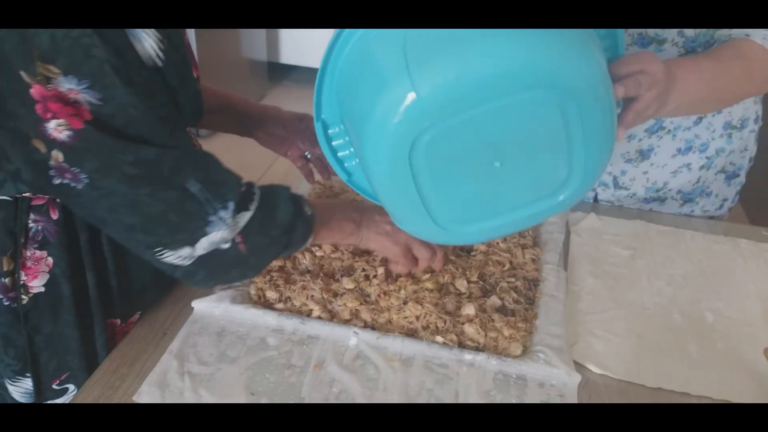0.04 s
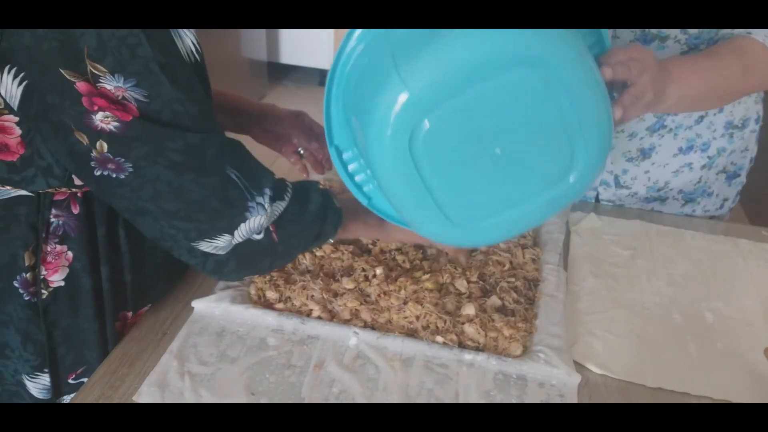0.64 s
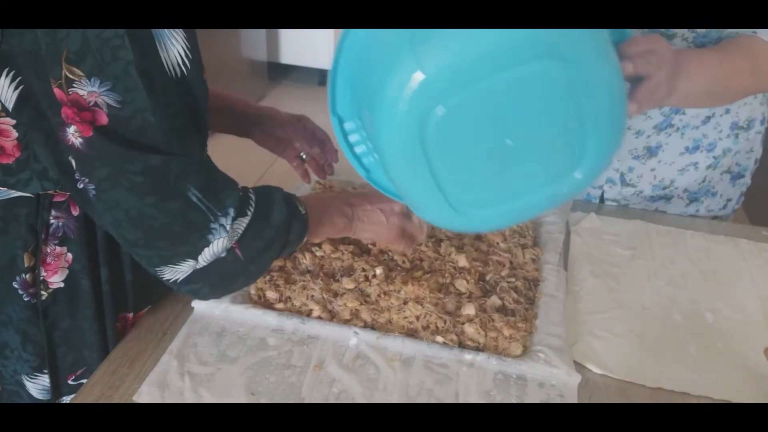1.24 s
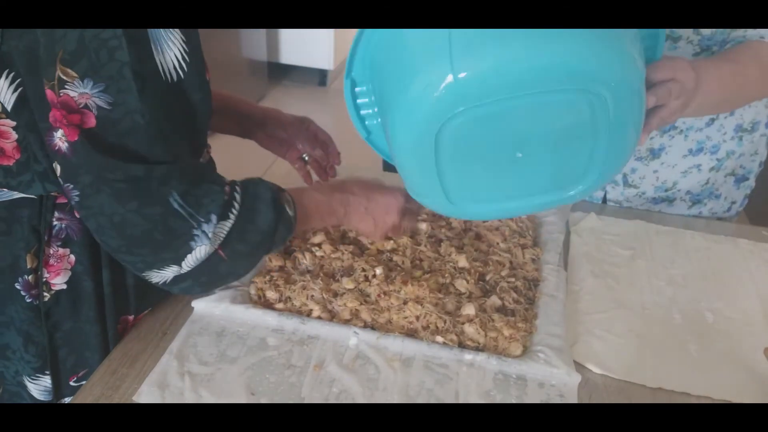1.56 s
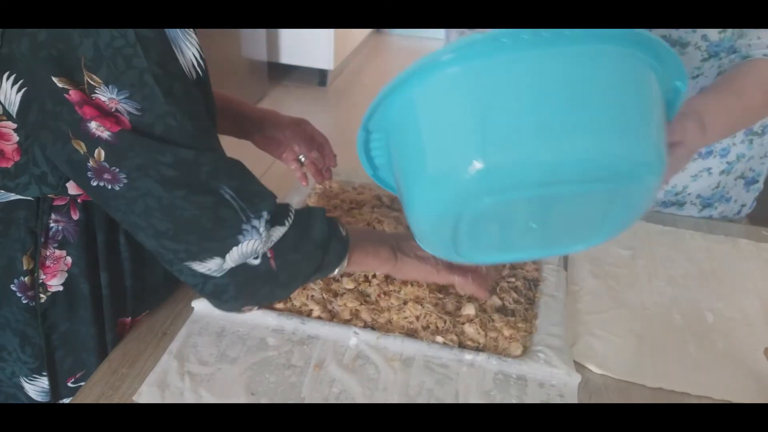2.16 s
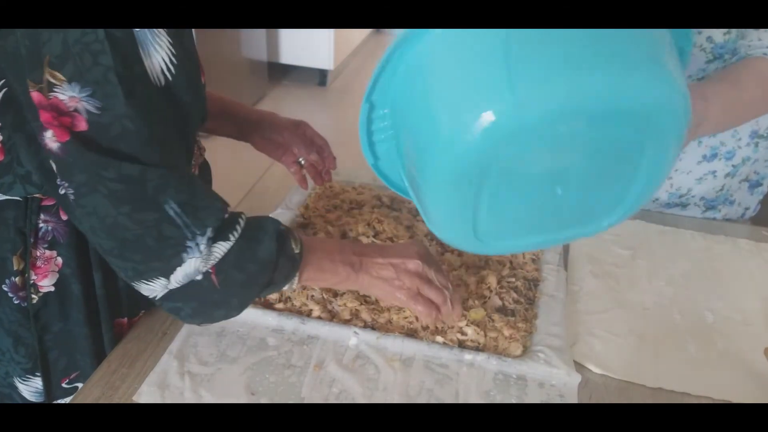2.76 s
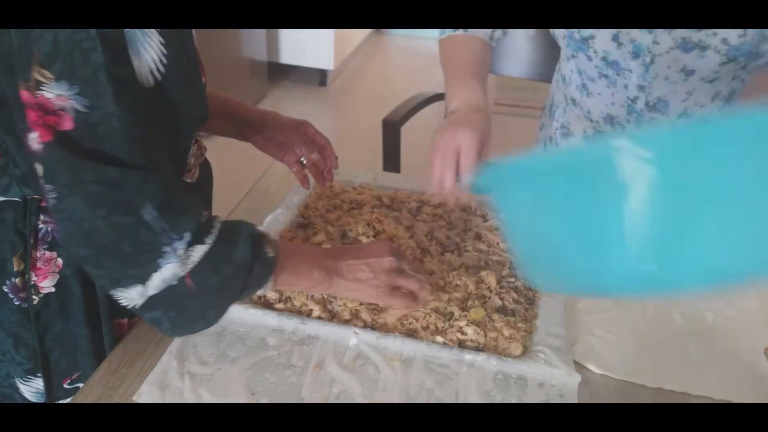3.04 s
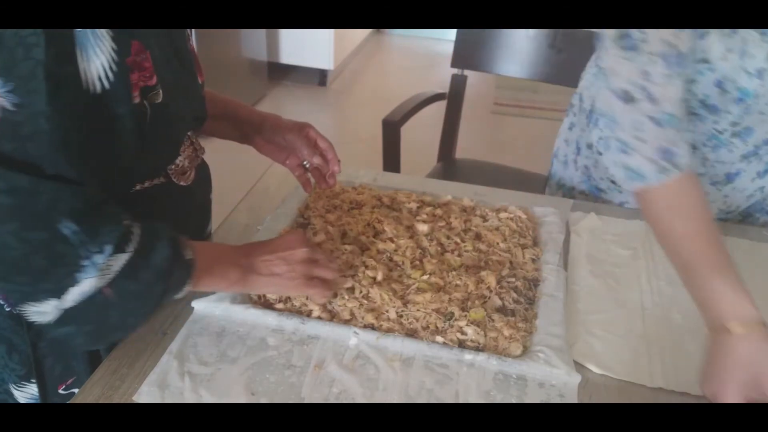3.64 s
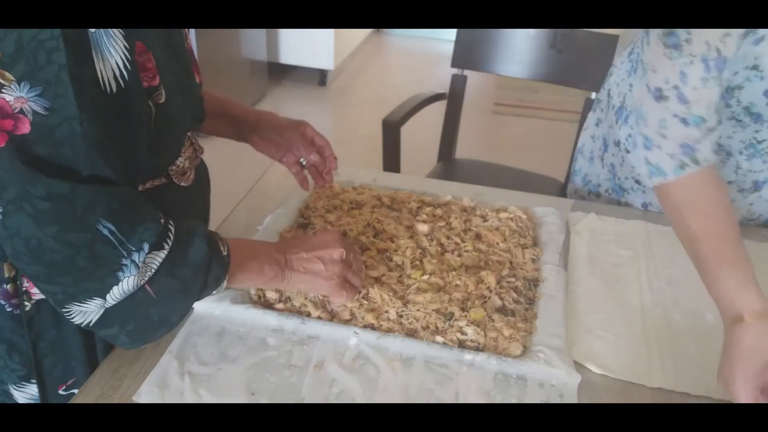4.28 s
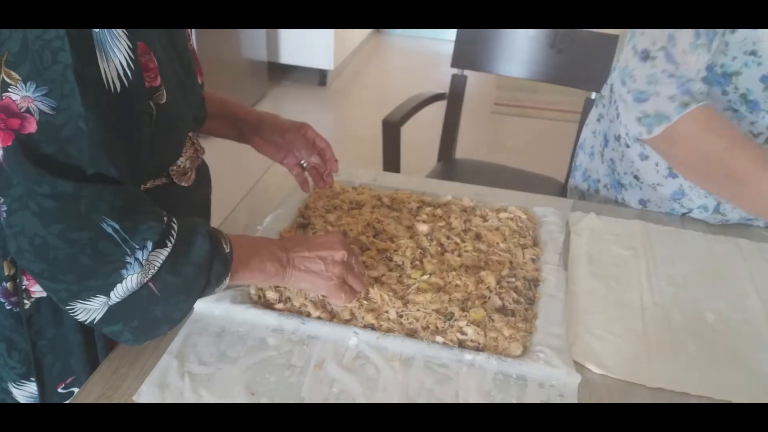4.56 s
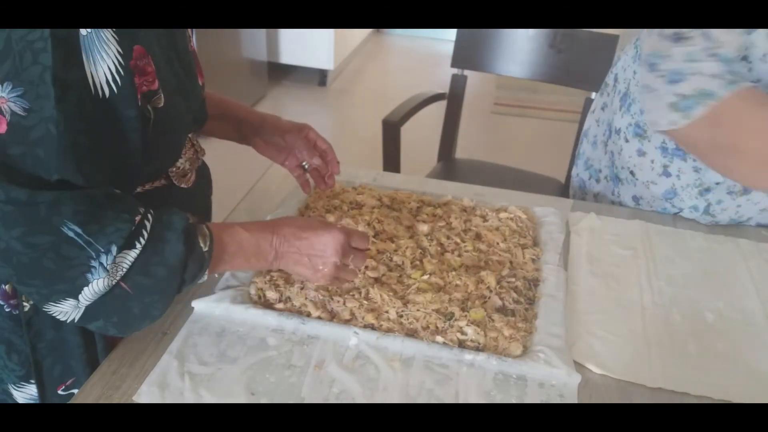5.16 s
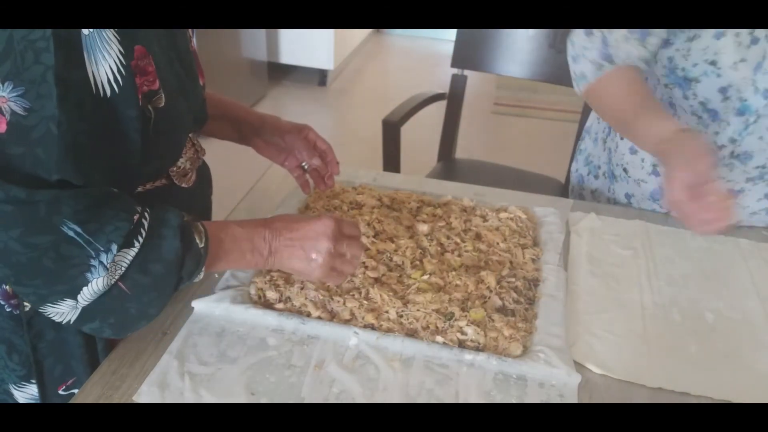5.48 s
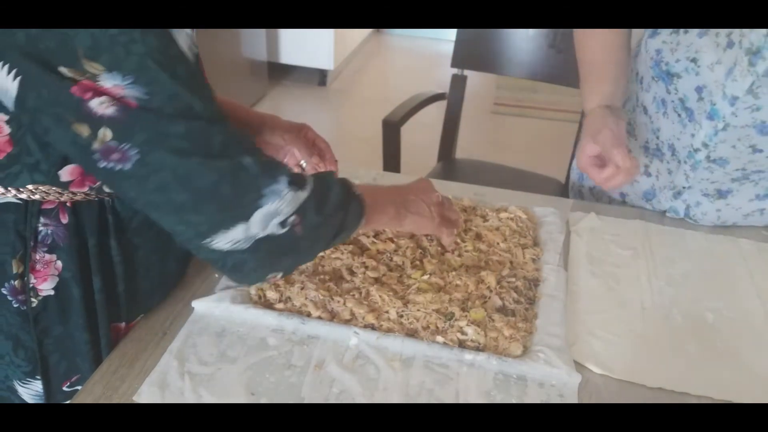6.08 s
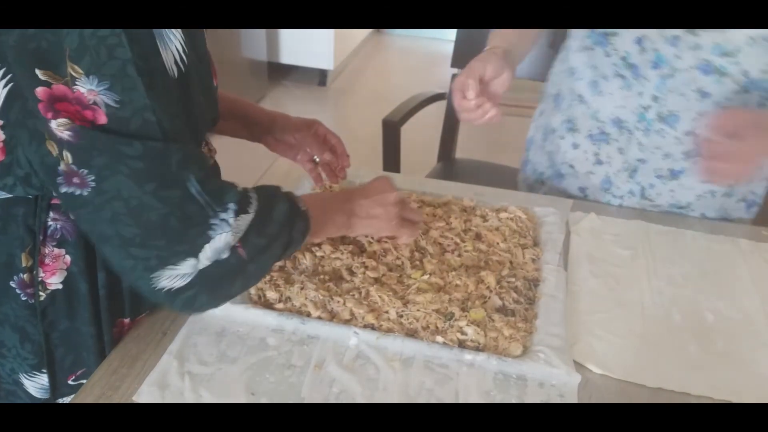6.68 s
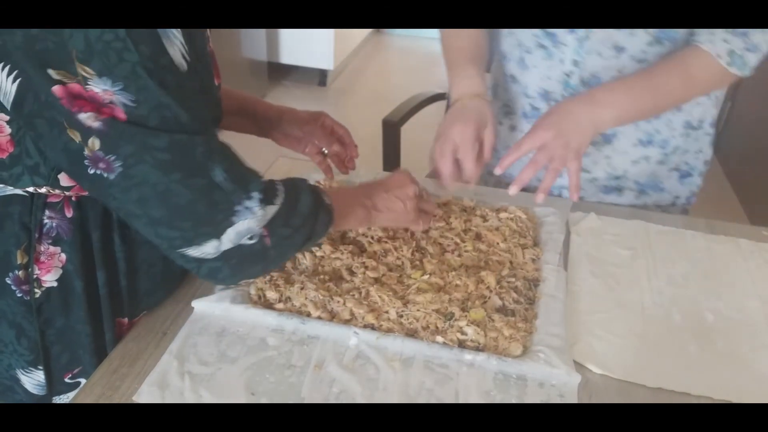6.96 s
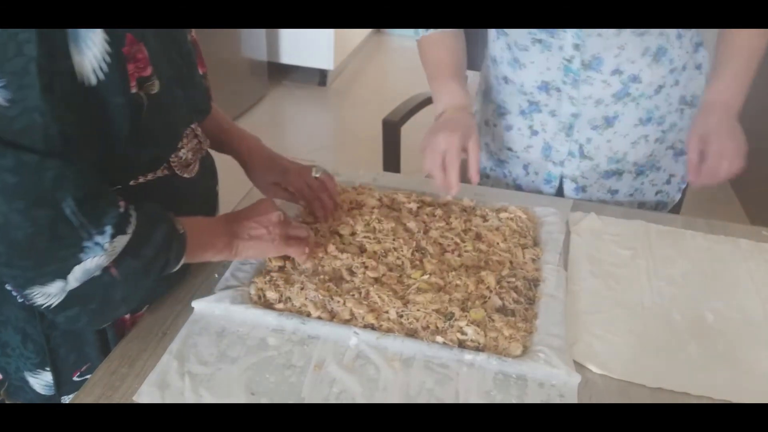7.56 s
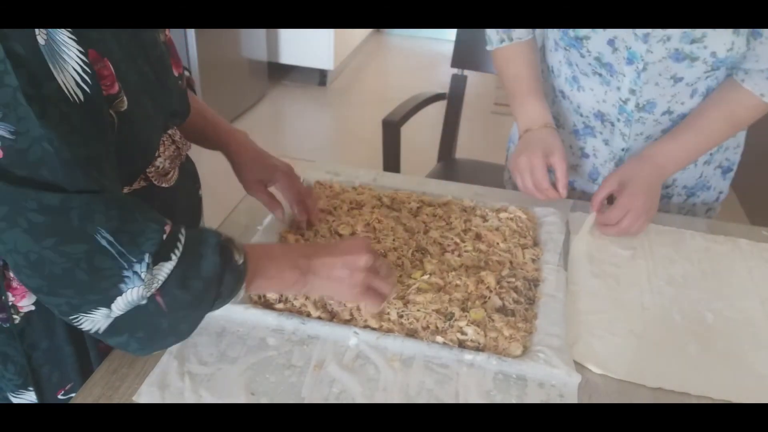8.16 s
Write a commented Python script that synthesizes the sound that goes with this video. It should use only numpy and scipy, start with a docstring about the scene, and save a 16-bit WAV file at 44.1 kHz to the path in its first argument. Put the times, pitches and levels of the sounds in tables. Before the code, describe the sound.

For the first three seconds, hands softly and irregularly pat moist filling close to the microphone, with light rubs and a faint crinkle of pastry at the start. Near 3.8 seconds a rub and another crinkle lead into a nudged dish, which clinks clearly at 4 seconds. At about 4.5 seconds an empty plastic basin lands a little further off with a loud hollow boom, then rocks and clatters until roughly 5.2 seconds. Two more sharp plastic knocks follow near 5.7 and 5.9 seconds. A slipper scuffs faintly at 6.3 seconds and a soft footstep thumps at 6.6. Quiet rubbing and a small crinkle return around 7 seconds, then a very faint, brief whine and a last pat near 7.6 seconds. The kitchen adds a short, hard-walled echo, and a low room murmur with faint hiss continues to the end, just past 8 seconds.

```python
"""Filling pastry, basin set aside

Hands pat and spread moist filling over crinkling pastry in a hard-walled kitchen; a nudged dish clinks.
An emptied plastic basin lands with a hollow boom, rocks, clatters and takes two last sharp knocks,
each blow ringing its bottom, walls and rim. A slipper scuffs, a footstep thumps softly,
and the hands go on quietly over room murmur and a brief whine."""
import sys
import numpy as np
from scipy import signal
from scipy.fft import rfft, irfft, next_fast_len
from scipy.io import wavfile
from scipy.ndimage import uniform_filter1d

SR = 44100
rng = np.random.default_rng(int(sys.argv[2]) if len(sys.argv) > 2 else 0)


def pcm_store(signal):
    """Save signal as 16-bit PCM."""
    levels = np.round(np.clip(np.atleast_2d(signal), -1, 1) * 32767)
    wavfile.write(sys.argv[1], SR, levels.astype(np.int16).T)


N = 371322
EVENT_S = np.arange(SR // 4) / SR


def amp(db):
    """Decibels to gain."""
    return 10 ** (np.asarray(db) / 20)


def curve(points, hz):
    """Interpolates on a log-frequency axis."""
    f, value = np.transpose(points)
    return np.interp(np.log(hz + 1), np.log(f), value)


def bell(hz, centre_hz, width_oct):
    """Bell of height 1 on a log-frequency axis."""
    return np.exp(-(np.log2((hz + 1) / centre_hz) / width_oct) ** 2)


def rolloff_db(ratio, order):
    """Butterworth slope, -3 dB at ratio 1."""
    return -10 * np.log10(1 + ratio ** (2 * order))


def decay(t60_s, t=EVENT_S):
    """Envelope falling 60 dB in t60_s."""
    return np.exp(-np.log(1000) * t / t60_s)


def unit_rms(x):
    """Scales to rms 1."""
    return x / np.sqrt(np.mean(x ** 2) + 1e-20)


def unit_attack(x):
    """Scales the first 10 ms to rms 1."""
    return x / np.sqrt(np.mean(x[:SR // 100] ** 2) + 1e-20)


def add(mix, start_s, sound):
    """Mixes a sound in at start_s."""
    part = mix[max(round(start_s * SR), 0):][:len(sound)]
    part += sound[:len(part)]


def colour(x, db_at):
    """Minimum-phase filter with gain db_at(hz)."""
    size = 2 * next_fast_len(len(x))
    hz = abs(np.fft.fftfreq(size, 1 / SR))
    log_gain = np.log(amp(np.maximum(db_at(hz), -100)))
    response = np.exp(np.conj(signal.hilbert(log_gain)))[:size // 2 + 1]
    return irfft(rfft(x, size) * response)[:len(x)]


def whiten(x, bins):
    """Flattens a burst's spectrum and fades its end."""
    spectrum = rfft(x)
    local_rms = np.sqrt(uniform_filter1d(abs(spectrum) ** 2, size=bins))
    return irfft(spectrum / local_rms, len(x)) * np.linspace(1, 0, len(x)) ** 2


def ring(modes, spread_db, low_hz=1, t60_scale=1):
    """Decaying sines; each blow lands elsewhere and shares its energy differently."""
    hz, db, t60_s = np.transpose(modes)[:, :, None]
    share = amp(db + spread_db * rng.standard_normal(hz.shape)) * rng.choice([-1, 1], hz.shape)
    share /= np.sqrt(1 + (low_hz / hz) ** 6)
    partials = share * decay(t60_s * t60_scale) * np.cos(2 * np.pi * hz * EVENT_S)
    attack = 1 - np.exp(-EVENT_S / 0.0006)
    return unit_attack(attack * partials.sum(0))


def dense_modes(db_at, t60_s, crack=0):
    """Unresolved modes as decaying noise, with an optional crack at contact."""
    envelope = decay(t60_s) + crack * np.exp(-EVENT_S / 0.0015)
    burst = rng.standard_normal(len(EVENT_S)) * envelope
    return unit_attack(colour(whiten(burst, bins=35), db_at))


def slips(per_s):
    """Tiny random clicks, a few much larger than the rest."""
    n = len(EVENT_S)
    sizes = rng.standard_normal(n) * amp(2.4 * np.minimum(rng.exponential(1, n), 4))
    return sizes * (rng.random(n) < per_s / SR)


# room noise spectrum (frequency [Hz], level [dB])
ROOM_TONE = [(15, -43), (25, -16), (59, 1), (126, 0.5), (246, -8), (509, -8.5), (1000, -13), (2420, -18.5),
             (3170, -16.5), (4750, -20.5), (6100, -14.5), (7500, -24), (15500, -27)]
def room_tone():
    """Steady low murmur and faint hiss, nearly alike on both sides."""
    hz = np.fft.rfftfreq(N, 1 / SR)
    mid, side = irfft(rfft(rng.standard_normal((2, N))) * amp(curve(ROOM_TONE, hz)), N)
    return amp(-60) * (unit_rms(mid) + amp(-14) * unit_rms(side) * np.array([[1], [-1]]))


def whine(start_s=7.32, end_s=7.62, pitch_hz=498):
    """A faint, fuzzy tone swells briefly: harmonics 2-4, no fundamental."""
    out = np.zeros(N)
    t = np.arange(start_s, end_s, 1 / SR)
    waver = unit_rms(uniform_filter1d(rng.standard_normal(len(t)), size=200))
    cycles = np.cumsum(pitch_hz * (1 + 0.017 * waver)) / SR
    tone = sum(np.sin(2 * np.pi * k * cycles) for k in (2, 3, 4))
    swell = np.sin(np.pi * np.linspace(0, 1, len(t)))
    add(out, start_s, amp(-63) * unit_rms(tone) * swell)
    return out


# reverberation (frequency [Hz], t60 [s])
ROOM_DECAY = [(100, 0.21), (300, 0.47), (700, 0.53), (1800, 0.47), (4500, 0.51), (9000, 0.39),
              (15000, 0.13)]
# counter and cupboard reflections (delay [s], relative gain [ratio])
REFLECTIONS = [(.0075, 0.4), (0.01, 0.5)]
def room_response(echo_db, tail_db):
    """Direct sound, single echoes, then a diffuse tail dying band by band."""
    taps = rng.choice([-1., 1.], SR) * (rng.random(SR) < 5000 / SR)
    hz, t, bands = signal.stft(taps, SR, nperseg=256)
    bands *= decay(curve(ROOM_DECAY, hz)[:, None], t)
    tail = signal.istft(bands, SR, nperseg=256)[1][:SR]
    build_up = 1 - np.exp(-(np.arange(SR) / SR / 0.0083) ** 2)
    out = amp(tail_db) * build_up * whiten(tail * build_up, bins=30)
    out[0] += 1
    for delay_s, gain in REFLECTIONS:
        add(out, delay_s, amp(echo_db) * gain * np.array([1, 2, 1]) / 4)
    return out


def kitchen(x, echo_db, tail_db, drift_hz=5.5):
    """Moving sources drift through three paths into the room."""
    cycles = np.arange(N) / SR * drift_hz
    shares = [2 / 3 * np.sin(np.pi * (cycles + k / 3)) ** 2 for k in range(3)]
    return sum(signal.oaconvolve(x * share, room_response(echo_db, tail_db))[:N] for share in shares)


# fine crackle (frequency [Hz], level [dB])
CRACKLE_SPECTRUM = [(1000, 6), (3000, 4), (6000, 14), (9000, 3.5), (16000, -28)]
def crackle(t60_s):
    """One small snap, then a dying scatter of others."""
    snaps = 0.75 * slips(per_s=600) * decay(t60_s)
    snaps[0] = 1
    return unit_attack(colour(snaps, lambda f: curve(CRACKLE_SPECTRUM, f)))


# sheets snapping (time [s], level [dB])
PASTRY_SNAPS = [(.188, -52), (3.844, -54.5), (6.921, -58.5)]
def pastry():
    """A sheet gives way: crisp snaps over a duller flap."""
    out = np.zeros(N)
    for start_s, db in PASTRY_SNAPS:
        flap = dense_modes(lambda f: -9 * abs(np.log2((f + 1) / 1700)), t60_s=0.11)
        add(out, start_s, amp(db) * (crackle(t60_s=0.41) + amp(-1.5) * flap))
    return out


# hand strokes and, at 6.294 s, one slipper scuff
# (time [s], length [s], level [dB], resonance [Hz], width [oct], scrape [Hz], scrape [dB])
RUB_EVENTS = [(0.183, 0.14, -57.5, 5830, 0.22, 2070, -12), (2.629, 0.097, -51.5, 1520, 0.61, 5800, -12),
              (2.793, 0.21, -63, 1030, .15, 1860, -26), (3.685, 0.34, -56.5, 1660, 0.27, 790, -6),
              (3.831, 0.07, -39.5, 1377, 0.36, 3640, -12), (6.294, 0.2, -55.5, 1694, 0.36, 3380, -7),
              (6.908, 0.07, -45.5, 1020, 0.45, 2440, -5.5), (7.157, 0.093, -57.5, 1770, 0.3, 8200, -5.5),
              (7.589, 0.086, -42, 723, 0.55, 2990, -10)]
def rubs():
    """Tiny slips swell and fade in each rub, heard as two resonances and fine crackle."""
    def resonance(x, centre_hz, width_oct):
        return unit_rms(colour(x, lambda f: rolloff_db(np.log2((f + 1) / centre_hz) / width_oct, 2)))

    out = np.zeros(N)
    for start_s, length_s, db, body_hz, width_oct, scrape_hz, scrape_db in RUB_EVENTS:
        swell = np.sin(np.pi * np.minimum(EVENT_S / length_s, 1))
        friction = slips(per_s=3000)
        body = resonance(friction, body_hz, width_oct)
        scrape = resonance(friction, scrape_hz, width_oct=0.17)
        fizz = unit_rms(colour(friction, lambda f: curve(CRACKLE_SPECTRUM, f)))
        add(out, start_s, amp(db) * swell * (body + amp(scrape_db) * scrape + amp(-33.5) * fizz))
    return out


# soft slap (frequency [Hz], level [dB])
SLAP_SPECTRUM = [(80, 0), (190, 5.5), (400, 0.5), (580, 4.5), (800, -7), (1000, 1), (1200, -6.5),
                 (1600, -1.5), (3000, -1.5), (9000, 7)]
def touch(thud_hz, hollow_hz, cutoff_hz, firmness):
    """Damped thud, slap with cupped-air resonance, crackle; firmness lifts thud and crackle."""
    def slap_db(f):
        hollow_db = 9.5 * bell(f, hollow_hz, width_oct=0.31)
        return curve(SLAP_SPECTRUM, f) + hollow_db + rolloff_db(f / cutoff_hz, order=4)

    envelope = np.exp(-EVENT_S / 0.0096) * (1 - np.exp(-EVENT_S / 0.0021))
    thud = unit_attack(np.sin(2 * np.pi * thud_hz * EVENT_S) * envelope)
    slap = dense_modes(slap_db, t60_s=0.1)
    snaps = crackle(t60_s=0.16)
    return amp(-4 + 14.5 * firmness) * thud + slap + amp(-26 + 15.5 * firmness) * snaps


# pats on the filling, a soft dish clink at 0.385 s and, at 6.611 s, one footstep # (time [s], level [dB], thud
# [Hz], hollow [Hz], slap cutoff [Hz], firmness [0-1])
SOFT_THUMPS = [(.064, -45.5, 294, 710, 1420, 0.46), (.385, -51, 569, 1090, 2260, 0),
               (0.646, -42, 198, 1000, 1240, 0), (.869, -55, 263, 1680, 1530, 0.1),
               (1.136, -40.5, 280, 1570, 1740, 0), (1.547, -47, 263, 1390, 3060, 1),
               (1.612, -51, 204, 1510, 1850, 0.06), (1.753, -41.5, 331.5, 455, 2200, 0.6),
               (2.307, -44, 220, 610, 2150, 0.03), (2.681, -42, 283, 475, 1830, 0.33),
               (6.611, -51.5, 152.7, 898, 907, 0), (7.638, -44.5, 445, 754, 1200, 0.08)]
def soft_thumps(lag_s=0.029, second_db=-3):
    """Two touches a thump, the second softer: in a pat, fingers then palm."""
    out = np.zeros(N)
    for start_s, db, thud_hz, hollow_hz, cutoff_hz, firmness in SOFT_THUMPS:
        first = touch(thud_hz, hollow_hz, cutoff_hz, firmness)
        second = touch(1.307 * thud_hz, hollow_hz, 0.69 * cutoff_hz, firmness)
        add(out, start_s, amp(db) * first)
        add(out, start_s + lag_s, amp(db + second_db) * second)
    return out


# dish resonances (frequency [Hz], level [dB], t60 [s])
DISH_MODES = [(895, -9.5, 0.099), (1100, 2.5, 0.097), (1193, 6, 0.05), (1893, 5.5, 0.064), (2153, 2, 0.08),
              (3066, -13, 0.16), (3523, -9, 0.07)]
# nudges, and at 3.84 s the sharp slap that starts a hand scrape (time [s], level [dB])
DISH_NUDGES = [(3.717, -53), (3.84, -42), (3.978, -27.5)]
def dish():
    """A dish nudged on the counter: short clinks over dull contact noise; the same sound gives a hand scrape
    its sharp onset at 3.84 s."""
    out = np.zeros(N)
    for start_s, db in DISH_NUDGES:
        contact = dense_modes(lambda f: -11 * abs(np.log2((f + 1) / 1000)), t60_s=0.079)
        add(out, start_s, amp(db) * (ring(DISH_MODES, spread_db=0.5) + amp(-4) * contact))
    return colour(out, lambda f: rolloff_db(f / 3300, order=4))


# bottom modes and prominent wall modes (frequency [Hz], level [dB], free t60 [s])
BOTTOM_MODES = [(96, -13.5, 0.3), (159, -13.5, 0.11), (245, -4.5, 0.13), (294.2, 3, 0.075),
                (367, -5.5, 0.062), (401.4, -1, 0.13), (469.6, 2, 0.18), (518.3, -2, 0.14),
                (544.3, -4, 0.12), (596, 2, 0.15)]
WALL_PEAKS = [(966, 7.5, 0.068), (1290, 2, 0.17), (1558, -4.5, 0.11), (1660, -5.5, 0.21), (1852, 3, 0.15),
              (2065, -1, 0.084), (3090, -5.5, 0.37), (4320, -7.5, 0.48), (4710, -9.5, .25)]
# dense modes of walls and rim (frequency [Hz], level [dB])
WALL_SPECTRUM = [(60, -32.5), (130, -14), (450, -2.5), (750, -3), (980, 1), (1150, -3.5), (1400, -1),
                 (2000, -2), (2700, -8), (4400, -11.5), (5500, -17), (9000, -39.5), (15000, -50.5)]
RIM_SPECTRUM = [(1500, -18), (3200, 1), (6000, 2), (8800, 4), (10500, -4.5), (13000, -3), (16000, -13.5)]
# basin settling, then held (time [s], low cutoff [Hz], t60 scale [ratio], wall peaks [dB])
BASIN_DAMPING = [(4.471, 100, 0.85, -2), (4.53, 250, 0.36, -0.5), (4.851, 348, 0.5, -10.5),
                 (5.702, 450.5, 0.38, -10), (5.951, 590, 0.12, -7)]
def basin_blow(start_s, place):
    """Bottom booms, walls clack, rim ticks; settling takes away low modes and ring time."""
    times_s, *damping = np.transpose(BASIN_DAMPING)
    low_hz, t60_scale, peaks_db = (np.interp(start_s, times_s, column) for column in damping)
    boom = ring(BOTTOM_MODES, spread_db=1, low_hz=low_hz, t60_scale=t60_scale)
    clack = dense_modes(lambda f: curve(WALL_SPECTRUM, f), t60_s=0.074 * np.sqrt(t60_scale), crack=0.81)
    clack += amp(peaks_db) * ring(WALL_PEAKS, spread_db=6, t60_scale=t60_scale)
    tick = dense_modes(lambda f: curve(RIM_SPECTRUM, f), t60_s=0.18, crack=0.93)
    places = [0, 0.5, 1]  # bottom, wall, rim
    boom_db = np.interp(place, places, [0.5, -3.5, -8.5])
    clack_db = np.interp(place, places, [-14.5, -2, -1])
    tick_db = np.interp(place, places, [-22.5, -27.5, -11])
    return amp(boom_db) * boom + amp(clack_db) * clack + amp(tick_db) * tick


# impacts, the 5.711 s row an echo of the 5.702 s knock # (time [s], level [dB], place [0 bottom, 0.5 wall, 1
# rim], favoured band [Hz], cutoff [Hz])
BASIN_IMPACTS = [(4.468, -8.5, 0.14, 288, 10870), (4.491, -15, 0.0083, 293, 7860),
                 (4.536, -17, 0.03, 510, 4000), (4.56, -9.5, 0.25, 870, 11120),
                 (4.755, -23, 0.87, 3010, 9000), (4.833, -14.5, 0.27, 509, 9000),
                 (4.845, -10.5, 0.87, 1676, 5730), (5.001, -21, 0.66, 1298, 4500),
                 (5.024, -12, 0.71, 1990, 4990), (5.041, -15, 0.08, 455.5, 6000),
                 (5.056, -16.5, .15, 410, 5020), (5.07, -13.5, 0.83, 398, 7000),
                 (5.086, -10, 0.78, 1350, 10740), (5.11, -15.5, 0.3, 604, 7000),
                 (5.12, -8.5, 0.72, 925, 8070), (5.163, -14.5, 0.26, 393, 4000),
                 (5.68, -28, 0.48, 674, 2500), (5.702, -12.5, 0.95, 960, 15500),
                 (5.711, -20.5, 0.28, 1100, 7000), (5.741, -21, 1, 880, 8000), (5.806, -22, 1, 2900, 6000),
                 (5.931, -20, 0.89, 970, 13000), (5.961, -20.5, 0.27, 607, 3500)]
def basin():
    """The basin lands, rocks and is knocked; each struck spot favours a narrow band of modes."""
    out = np.zeros(N)
    for start_s, db, place, favoured_hz, cutoff_hz in BASIN_IMPACTS:
        def contact_db(f):
            return 6 * bell(f, favoured_hz, width_oct=0.17) + rolloff_db(f / cutoff_hz, order=2)

        add(out, start_s, amp(db) * colour(basin_blow(start_s, place), contact_db))
    return out


def scene():
    """Basin, dish and whine further off; thumps, rubs and pastry close, with stronger early echoes."""
    far = kitchen(basin() + dish() + whine(), echo_db=-7.5, tail_db=3)
    near = kitchen(soft_thumps() + rubs() + pastry(), echo_db=-1, tail_db=2.94)
    handling = amp(-2) * far + amp(1.7) * near
    low_cut = signal.butter(3, 70, "highpass", fs=SR, output="sos")  # small things radiate no deep bass
    return signal.sosfilt(low_cut, handling) + room_tone()


# port imbalance (frequency [Hz], left minus right [dB])
PORT_BALANCE = [(900, 0), (1450, .6), (1890, 3.6), (2200, 1.4), (3000, 0)]
# port phase difference (frequency [Hz], left lead [rad])
PORT_PHASE = [(800, 0), (1640, .19), (2150, -.21), (3500, 0)]
def record(dry, cutoff_hz=15850):
    """Two close microphone ports, slightly apart in level and phase; soft overload; band limit."""
    hz = np.fft.rfftfreq(N, 1 / SR)
    sides = np.array([[0.5], [-0.5]])
    gain = amp(curve(PORT_BALANCE, hz) * sides)
    phase_rad = curve(PORT_PHASE, hz) * sides
    ports = irfft(rfft(dry) * gain * np.exp(1j * phase_rad), N)
    clipped = ports / (1 + ports ** 8) ** (1 / 8)
    lowpass = signal.firwin(511, cutoff_hz, window=("kaiser", 9), fs=SR)
    return signal.oaconvolve(clipped, lowpass[None], "same")


dry = scene()
out = record(dry)
pcm_store(out)
```